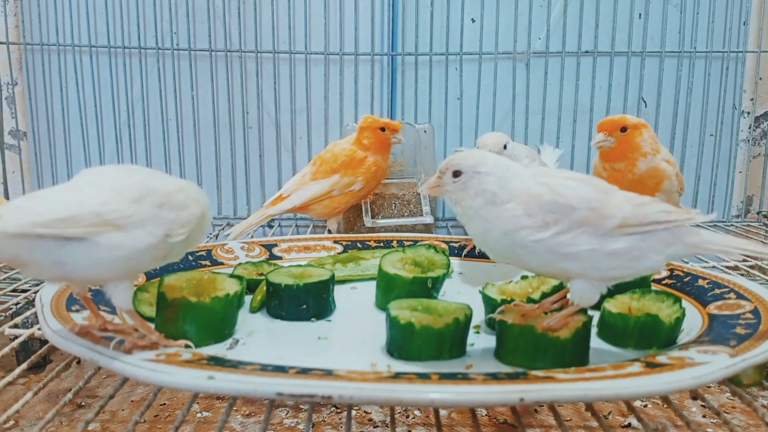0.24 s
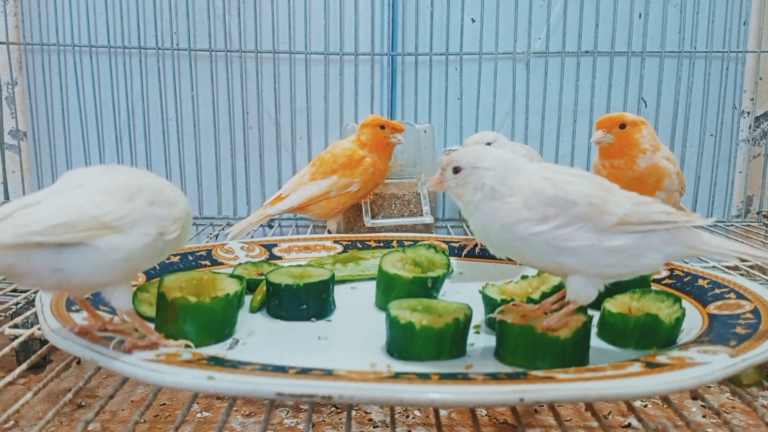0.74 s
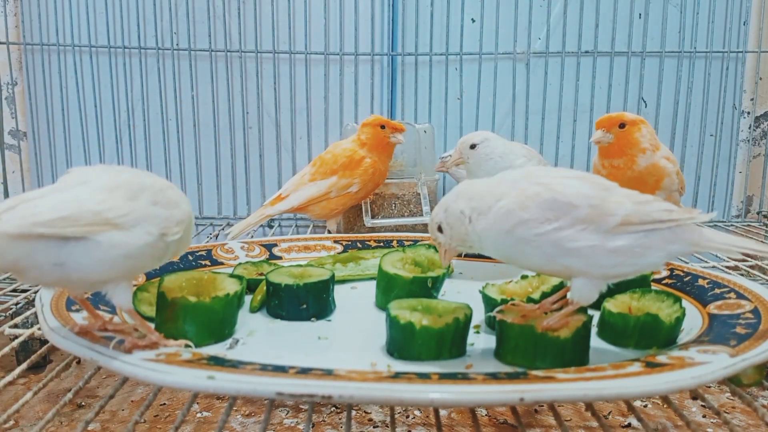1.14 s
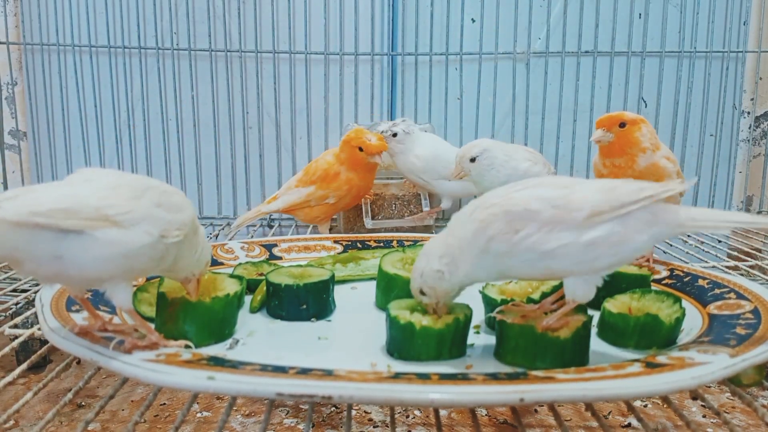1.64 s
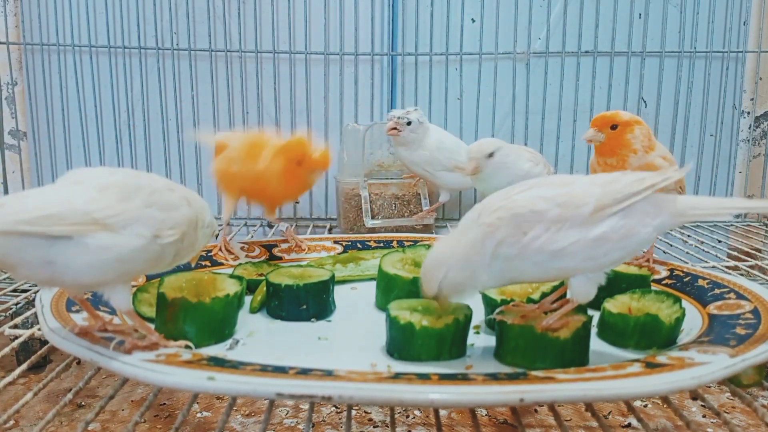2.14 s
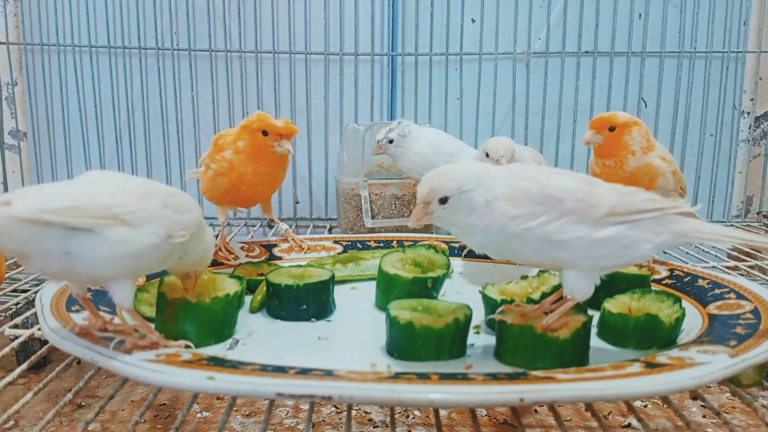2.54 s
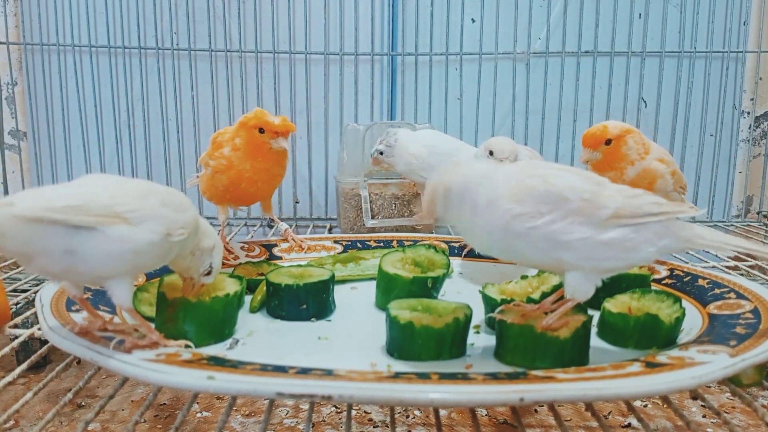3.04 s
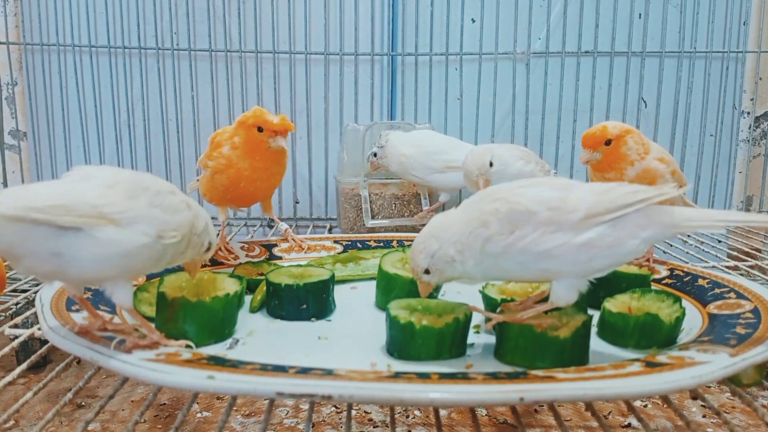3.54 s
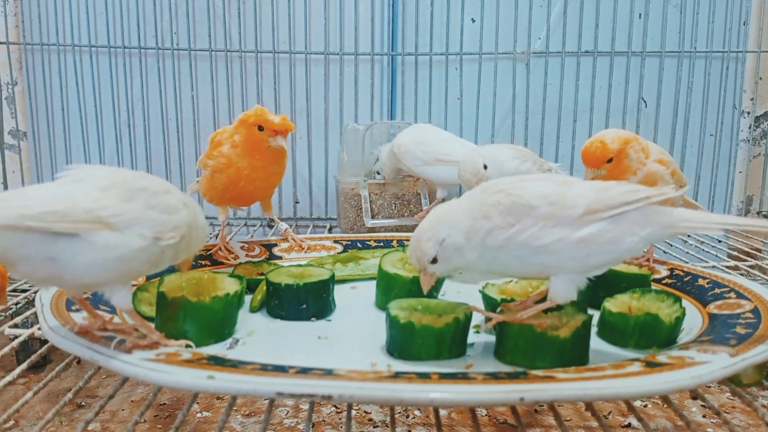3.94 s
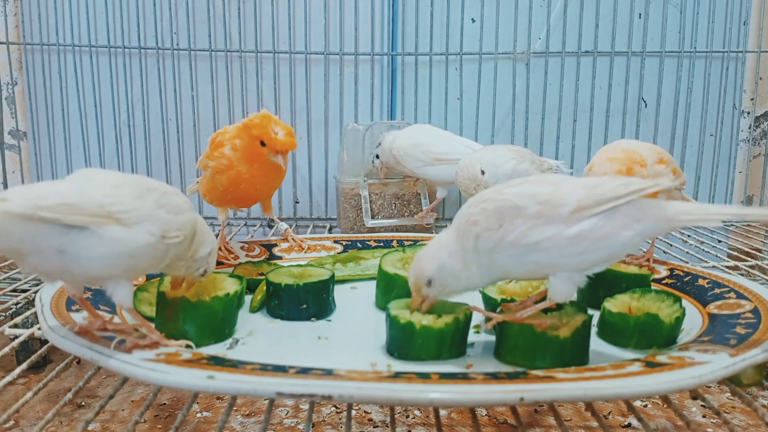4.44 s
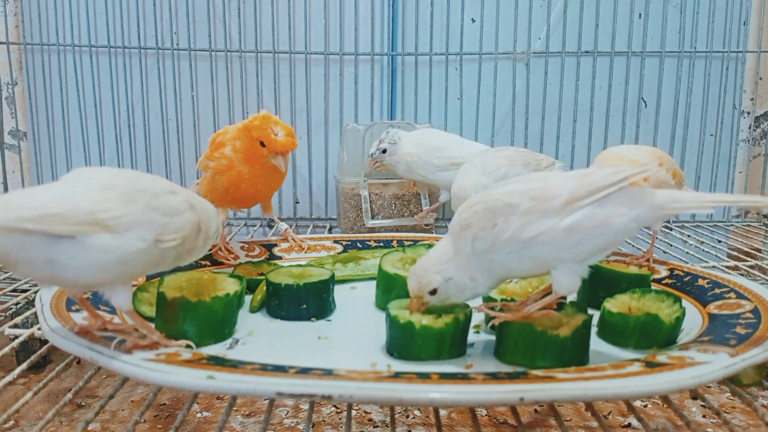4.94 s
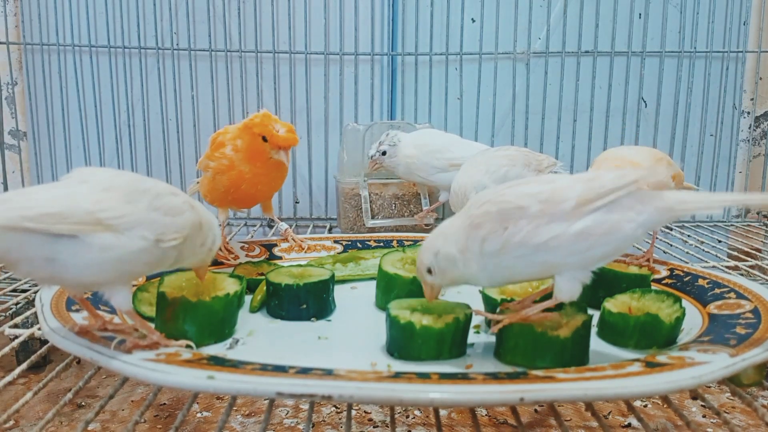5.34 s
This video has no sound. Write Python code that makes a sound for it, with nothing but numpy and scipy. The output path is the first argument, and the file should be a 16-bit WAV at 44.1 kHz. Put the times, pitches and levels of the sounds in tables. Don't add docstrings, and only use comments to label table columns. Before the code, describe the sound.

Several canaries whistle, trill and scold hoarsely in overlapping quick calls inside an echoing indoor cage, over a low house hum.

```python
import sys
import numpy as np
from scipy import signal
from scipy.fft import rfft, irfft
from scipy.io import wavfile
from scipy.ndimage import uniform_filter1d

SR = 44100
rng = np.random.default_rng(int(sys.argv[2]) if len(sys.argv) > 2 else 0)


def level_to_linear(level):
    exponent = np.asarray(level, float) / 20
    return 10 ** exponent


def bounce(signal):
    frames = np.transpose(np.atleast_2d(signal))
    limited = np.clip(frames, -1, 1)
    pcm = np.round(limited * 32767).astype(np.int16)
    wavfile.write(sys.argv[1], SR, pcm)


N = 246959


def unit(x):
    return x / np.sqrt(np.mean(x ** 2) + 1e-18)


def ring(x, hz, width_hz):
    return signal.lfilter(*signal.iirpeak(hz, hz / width_hz, fs=SR), x)


def steep(x, hz, width_hz):
    for _ in range(3):
        x = ring(x, hz, width_hz)
    return x


def walk(rate, size):
    k = max(int(SR / rate), 2)
    noise = rng.standard_normal(size + 4 * k)
    smooth = uniform_filter1d(uniform_filter1d(noise, k), k)
    return unit(smooth[2 * k:2 * k + size])


def add(out, sound, start_s, pan_db):
    i = int(max(start_s, 0) * SR)
    sides = level_to_linear(np.array([[pan_db], [-pan_db]]) / 2)
    out[:, i:i + len(sound)] += sound[:N - i] * sides


def walls(x, early_db, early_s, late_db, late_s):
    t = np.arange(int(.6 * SR)) / SR
    early = level_to_linear(early_db - 60 * t / early_s) / np.sqrt(early_s)
    late = level_to_linear(late_db - 60 * t / late_s) / np.sqrt(late_s)
    onset = np.clip(t / 0.0019, 0, 1)
    echo = rng.standard_normal((2, len(t))) * (early + late) * onset * np.sqrt(14 / SR)
    shared = echo.mean(axis=0)
    treble = signal.butter(2, 2000, "high", fs=SR, output="sos")
    echo = shared * 1.12 + signal.sosfilt(treble, 1.2 * (echo - shared))
    return signal.fftconvolve(np.tile(x.mean(axis=0), (2, 1)), echo, axes=1)[:, :N]


def whistle(note, flutter_db, flutter_rate, wobble, overtone_db, edge_s):
    s, hz, db = np.transpose(note)
    t = np.arange(s[0] - edge_s, s[-1] + edge_s, 1 / SR)
    pitch = uniform_filter1d(np.interp(t, s, hz), size=60) * (1 + wobble * walk(flutter_rate, len(t)))
    phase = 2 * np.pi * np.cumsum(pitch) / SR
    to_end_s = np.minimum(t - t[0], t[-1] - t)
    edge = np.sin(np.pi / 2 * np.clip(to_end_s / (2 * edge_s), 0, 1)) ** 2
    strength = edge * level_to_linear(np.interp(t, s, db) + flutter_db * walk(flutter_rate, len(t)))
    return np.sqrt(2) * strength * (np.sin(phase) + level_to_linear(overtone_db) * np.sin(2 * phase))


SYLLABLE_SHAPES = {"even": (.1, 0, .5, -1, -2), "glide": (.1, 0, .55, -9, -10),
                   "swell": (.3, 0, .9, -12, -2), "fade": (.1, 0, .1, -1, -10),
                   "ease": (1.3, 0, .45, -7, -7), "hook": (6, 0, .3, -9, -8), "leap": (1.3, 0, .2, -1, -6),
                   "sag": (-1.3, 0, .4, -15, -10), "droop": (-4, 0, .6, -1.5, -4),
                   "arch": (6, .95, .5, -7, -6)}


def syllable(kind, start_s, length_s, from_hz, to_hz, level_db):
    haste, back, top, start_db, end_db = SYLLABLE_SHAPES[kind]
    share = np.arange(17) / 16
    slide = np.expm1(-haste * share) / np.expm1(-haste) - back * share ** 3
    strength_db = np.interp(share, [0, np.clip(top, .02, .98), 1], [start_db, 0, end_db])
    pitch_hz = from_hz + (to_hz - from_hz) * slide
    return np.transpose([start_s + share * length_s, pitch_hz, level_db + strength_db])


def perched(perches, pans_db):
    return [(syllable(*row), pan_db) for rows, pan_db in zip(perches, pans_db) for row in rows]


# kind, start_s, length_s, from_hz, to_hz, level_db
NEAR_LEFT = [
    ("leap", 0, .048, 4570, 5480, -30),
    ("droop", .048, .045, 5520, 5000, -34),
    ("leap", .095, .18, 4930, 4200, -29),
    ("ease", .095, .15, 9860, 8600, -60),
    ("swell", 1.012, .05, 3030, 2960, -35),
    ("even", 1.062, .075, 2960, 2250, -32),
    ("leap", 1.137, .033, 2250, 2040, -35),
    ("fade", 4.855, .055, 4140, 4214, -33),
]
NEAR_MIDDLE = [("leap", 0, .045, 3347, 5500, -29), ("sag", 2.165, .092, 2340, 2480, -23.5),
               ("ease", 2.303, .013, 2820, 3800, -29), ("droop", 2.316, .019, 3950, 2950, -25),
               ("droop", 2.344, .024, 3800, 2950, -19), ("arch", 2.37, .026, 2950, 3750, -15.5),
               ("arch", 2.398, .02, 2900, 3620, -23), ("fade", 2.78, .055, 4860, 4440, -31),
               ("droop", 4.61, .017, 3420, 2800, -20), ("sag", 4.786, .012, 3860, 5920, -21),
               ("swell", 4.91, .027, 2850, 3010, -19), ("ease", 4.939, .026, 2250, 2870, -22.5),
               ("ease", 5.008, .036, 2120, 2750, -22), ("leap", 5.047, .016, 2480, 2680, -30),
               ("swell", 4.924, .016, 2220, 2280, -34), ("fade", 4.962, .014, 2850, 2330, -33)]
NEAR_RIGHT = [("swell", .115, .06, 4320, 4160, -32), ("swell", .343, .014, 4850, 4730, -26),
              ("leap", .357, .018, 4650, 3100, -35), ("ease", .622, .028, 4900, 3600, -25),
              ("even", .65, .042, 3560, 3500, -31.5), ("hook", 2.515, .032, 2830, 3040, -22.5),
              ("even", 4.763, .008, 3600, 4000, -26), ("swell", 4.77, .017, 3950, 3830, -18),
              ("fade", 4.788, .027, 3850, 3830, -29), ("leap", 4.977, .021, 2900, 2980, -25),
              ("swell", 4.998, .017, 2950, 3020, -20)]
# time_s, pitch_hz, level_db
DIP_AND_RISE = [(1.87, 3025, -42), (1.964, 2760, -30), (2.017, 2640, -34), (2.06, 2830, -25),
                (2.086, 2988, -16.5), (2.108, 3020, -17.5), (2.116, 2980, -42)]
TRILL_END = [(2.417, 3060, -24), (2.433, 3670, -30), (2.475, 3570, -19.5), (2.504, 2980, -18.5),
             (2.515, 2820, -27)]
FLAT_PIPE = [(4.4, 2635, -53), (4.431, 2696, -34.5), (4.485, 2691, -26), (4.544, 2680, -32.5),
             (4.56, 2620, -48)]
LOUD_CHIRP = [(4.638, 3200, -24), (4.645, 3663, -19.5), (4.654, 3270, -16), (4.701, 2930, -13.5),
              (4.709, 3035, -24), (4.72, 2850, -24)]
HIGH_CHIRP = [(4.797, 5800, -30), (4.802, 4780, -21), (4.812, 4500, -19), (4.825, 4280, -15.5),
              (4.837, 4250, -22), (4.848, 4000, -16), (4.852, 4000, -42)]


def near_whistles():
    out = np.zeros((2, N))
    left_db, middle_db, right_db = 5.5, 1.0, -4.5
    notes = perched((NEAR_LEFT, NEAR_MIDDLE, NEAR_RIGHT), (left_db, middle_db, right_db))
    notes += [(DIP_AND_RISE, left_db), (FLAT_PIPE, 10.0)]
    notes += [(note, middle_db) for note in (TRILL_END, LOUD_CHIRP, HIGH_CHIRP)]
    for note, pan_db in notes:
        sound = whistle(note, flutter_db=1.2, flutter_rate=250, wobble=.004, overtone_db=-54, edge_s=.003)
        add(out, sound, note[0][0] - .003, pan_db)
    return out


def rasp(length_s, level_db, throat_hz, bright_db):
    whole_s = length_s + 0.033
    t = np.arange(0, whole_s, 1 / SR)
    size = len(t)
    cycle = np.cumsum(120 * (1 + .2 * walk(60, size)) / SR) % 1
    puff = .15 + np.exp(-cycle / 0.25)
    air = puff * level_to_linear(1.4 * walk(110, size) + 2.0 * walk(25, size)) * rng.standard_normal(size)
    throat = unit(steep(air, throat_hz, 560))
    throat = throat + level_to_linear(-3) * buzz(whole_s, throat_hz, 0.1 * throat_hz, 132, 0)
    grains = (.12 + np.sin(np.pi * cycle) ** 2) * level_to_linear(2.2 * walk(70, size))
    throat = unit(throat * grains)
    throat = throat + level_to_linear(-6.5) * unit(steep(air, 0.74 * throat_hz, 900))
    throat = throat + level_to_linear(-6.5) * unit(steep(air, 3800, 1500))
    beak = unit(steep(air, 7700, 1700)) + level_to_linear(-11) * unit(steep(air, 5850, 500))
    beak = beak + level_to_linear(-13.5) * unit(steep(air, 10170, 3400)) + level_to_linear(-17) * unit(steep(air, 14600, 2600))
    swell = np.clip(t / .012, 0, 1) * np.clip((whole_s - t) / 0.055, 0, 1)
    opening = np.abs(np.sin(np.pi * t / whole_s)) ** 0.55
    return level_to_linear(level_db) * swell * (unit(throat) + level_to_linear(bright_db) * opening * beak)


# start_s, length_s, level_db, throat_hz
SHARP_SCOLDS = [
    (0, 0.043, -41, 4140),
    (0.153, 0.1, -43, 2750),
    (1.012, 0.071, -52.5, 2590),
    (1.264, 0.047, -42, 2680),
    (1.66, 0.027, -51, 2600),
    (1.951, .11, -38.5, 2700),
    (2.159, 0.06, -35, 2980),
    (2.424, 0.058, -42, 2520),
    (2.606, 0.059, -40, 3130),
    (4.65, .13, -42.5, 2560),
]
PLAIN_SCOLDS = [(0.316, .12, -38.5, 2870), (0.521, 0.17, -39.5, 2663), (0.738, .11, -38, 2810),
                (1.099, 0.072, -45.5, 2340), (1.41, 0.15, -40, 2740), (1.597, 0.063, -38, 2760),
                (1.845, .05, -40.5, 2540), (2.778, 0.1, -40, 2870), (3.01, 0.05, -44, 2500),
                (3.164, 0.03, -46.5, 2870), (3.29, 0.056, -40.5, 2775), (3.441, 0.077, -40, 2790),
                (3.925, 0.058, -51, 2176), (4.124, 0.12, -43.5, 2650), (4.479, 0.15, -43.5, 2570),
                (4.85, 0.043, -37, 2800), (5.175, 0.09, -49, 3280)]
DULL_SCOLDS = [
    (3.71, 0.11, -57, 1680),
    (3.795, 0.063, -47, 1860),
    (4.02, .05, -48.5, 2410),
    (4.343, 0.08, -49, 2350),
    (4.994, 0.055, -35, 2890),
]


def scolds():
    out = np.zeros((2, N))
    for rows, bright_db in ((SHARP_SCOLDS, -10.5), (PLAIN_SCOLDS, -15), (DULL_SCOLDS, -20.5)):
        for start_s, *voice in rows:
            add(out, rasp(*voice, bright_db), start_s - .006, pan_db=-2.0)
    return out


def coloured(points, alike_hz, draught_hz):
    hz = np.arange(N // 2 + 1) * SR / N + 1
    point_hz, point_db = np.transpose(points)
    shape = level_to_linear(np.interp(np.log(hz), np.log(point_hz), point_db))
    mid, side = rfft(rng.standard_normal((2, N))) * shape
    side = side * np.maximum(hz / (hz + alike_hz), draught_hz / (hz + draught_hz))
    return unit(irfft(np.array([mid + side, mid - side]), N))


# time_s, hum_db, twitter_db
ROOM_LEVELS = [(0, -45, -50), (1, -46.5, -52), (2.5, -46, -51.5), (3.6, -48, -53), (5.22, -50.5, -51),
               (5.32, -51, -60), (5.6, -48, -66)]
# pitch_hz, level_db (per Hz)
HUM_COLOUR = [(25, -32.5), (45, -12), (70, -2), (270, -11), (420, -13), (900, -16), (1600, -27),
              (3000, -26.5), (6000, -54)]
# pitch_hz, width_hz, level_db
ROOM_RINGS = [(115, 7.7, -4), (205, 15, -5.5), (266.6, 31, -3.5)]
# pitch_hz, level_db (per Hz)
TWITTER_COLOUR = [(500, -34.5), (1000, -4.5), (2000, -6), (4200, -7.5), (5600, -19), (8200, -21),
                  (9500, -20), (12300, -23), (13000, -31.5)]


def background():
    s, hum_db, twitter_db = np.transpose(ROOM_LEVELS)
    t = np.arange(N) / SR
    hum = coloured(HUM_COLOUR, alike_hz=1800, draught_hz=45)
    for hz, width_hz, db in ROOM_RINGS:
        tone = ring(ring(rng.standard_normal(N), hz, width_hz), hz, 4 * width_hz)
        hum = hum + level_to_linear(db) * unit(tone)
    twitter = coloured(TWITTER_COLOUR, alike_hz=18000, draught_hz=1) * level_to_linear(1.44 * walk(6.95, N))
    return hum * level_to_linear(np.interp(t, s, hum_db) - 4.0) + twitter * level_to_linear(np.interp(t, s, twitter_db))


# kind, start_s, length_s, from_hz, to_hz, level_db
FAR_LEFT = [
    ("swell", .022, .103, 3430, 3720, -33),
    ("even", .72, .06, 2190, 2170, -52),
    ("fade", .8, .06, 4086, 3950, -46),
    ("even", 1.42, .04, 6300, 6200, -56),
    ("ease", 1.575, .085, 2150, 2750, -38),
    ("swell", 1.865, .035, 6050, 5780, -40),
    ("even", 2.505, .11, 6715, 6710, -47),
    ("ease", 3.25, .18, 2440, 2770, -46),
]
FAR_MIDDLE = [("fade", .7, .03, 3520, 3480, -38), ("swell", .92, .055, 3900, 4300, -44),
              ("even", .9, .09, 3200, 3800, -54), ("ease", 1.352, .045, 4150, 4300, -45),
              ("fade", 2.642, .06, 5950, 5850, -46), ("fade", 2.728, .024, 8350, 7300, -50),
              ("fade", 1.205, .065, 3900, 3850, -47), ("ease", 1.525, .105, 4990, 4160, -43),
              ("even", 1.63, .22, 1920, 2000, -49), ("droop", 1.685, .045, 4900, 4620, -40),
              ("ease", 1.73, .04, 4620, 4300, -35), ("fade", 1.77, .05, 4300, 4300, -38),
              ("hook", 2.065, .075, 3890, 4250, -42), ("hook", 2.12, .12, 6700, 5780, -40),
              ("arch", 2.21, .115, 7150, 6550, -43), ("even", 2.725, .028, 6100, 4600, -36),
              ("droop", 2.753, .009, 4600, 3700, -37), ("swell", 2.75, .03, 7000, 4850, -37),
              ("droop", 2.843, .034, 3800, 2900, -35), ("fade", 2.84, .06, 4600, 4060, -31),
              ("swell", 3.175, .025, 3600, 2820, -41), ("swell", 3.315, .02, 4100, 2700, -30.5),
              ("fade", 3.64, .11, 3850, 3930, -63), ("droop", 5.315, .045, 4430, 4200, -44),
              ("fade", 5.33, .04, 8930, 8530, -59)]
FAR_RIGHT = [("arch", .39, .075, 3800, 4300, -46), ("arch", .535, .05, 3880, 4200, -42),
             ("even", .71, .045, 4400, 4105, -45), ("swell", .965, .035, 3930, 4120, -46),
             ("hook", 1.085, .07, 5200, 3640, -33), ("ease", 1.16, .04, 3650, 3960, -35),
             ("ease", 1.283, .04, 2950, 3320, -37), ("droop", 1.323, .014, 3320, 3080, -40),
             ("ease", 1.895, .05, 5450, 3170, -34), ("sag", 2.055, .085, 8520, 7240, -41),
             ("glide", 2.32, .11, 8400, 7480, -41), ("even", 2.43, .09, 7450, 5800, -60),
             ("even", 2.68, .03, 5000, 2940, -41), ("even", 2.87, .13, 7100, 7070, -63),
             ("even", 2.995, .035, 4640, 4340, -51), ("ease", 4.8, .05, 14500, 11800, -55),
             ("fade", 5.33, .2, 3560, 3530, -63)]
# time_s, pitch_hz, level_db
LOW_PIPE = [(2.725, 2010, -52), (2.803, 2195, -41), (2.864, 2378, -37), (2.89, 2330, -47),
            (3.001, 2368, -41), (3.1, 2224, -62)]
FAR_PIPE = [(3.38, 2097, -50), (3.47, 2010, -43), (3.57, 1640, -53), (3.66, 1881, -51), (3.8, 1956, -51),
            (3.95, 1960, -60)]


def far_whistles():
    out = np.zeros((2, N))
    left_db, middle_db, right_db = 5, -1.2, -7
    notes = perched((FAR_LEFT, FAR_MIDDLE, FAR_RIGHT), (left_db, middle_db, right_db))
    notes += [(FAR_PIPE, middle_db), (LOW_PIPE, 10.0)]
    for note, pan_db in notes:
        sound = whistle(note, flutter_db=2.0, flutter_rate=347, wobble=0.006, overtone_db=-41, edge_s=.004)
        add(out, sound, note[0][0] - .004, pan_db)
    return out


# time_s, pitch_hz, level_db
COOS = [
    [(.09, 370, -43), (.12, 387, -44), (.2, 381, -46)],
    [(1.56, 306, -45), (1.62, 274, -62)],
    [(2.8, 350, -46), (2.84, 385, -43), (2.9, 400, -50), (3.0, 415, -50), (3.04, 415, -66)],
    [(2.83, 470, -52), (2.95, 482, -47), (3.13, 485, -48), (3.2, 480, -58), (3.3, 475, -51),
     (3.4, 480, -66), (3.6, 478, -55), (3.65, 478, -66)],
]


def dove():
    out = np.zeros((2, N))
    for coo in COOS:
        sound = whistle(coo, flutter_db=3.5, flutter_rate=45, wobble=.025, overtone_db=-40, edge_s=.012)
        add(out, sound, coo[0][0] - .012, pan_db=0)
    blur = walls(out, early_db=-8.5, early_s=0.13, late_db=-8, late_s=0.6)[0]
    return out * level_to_linear(-3) + blur


def buzz(length_s, hz, swing_hz, rate, level_db, slide_hz=0):
    t = np.arange(0, length_s, 1 / SR)
    size = len(t)
    swing = np.cos(2 * np.pi * np.cumsum(rate * (1 + .18 * walk(50, size))) / SR)
    pitch = hz + slide_hz * t / length_s + swing_hz * swing * (1 + 0.26 * walk(80, size))
    phase = 2 * np.pi * np.cumsum(pitch) / SR
    edge = np.clip(np.minimum(t, length_s - t) / 0.0028, 0, 1)
    tone = np.sin(phase) + level_to_linear(-26) * np.sin(2 * phase) + level_to_linear(-38) * np.sin(3 * phase)
    return level_to_linear(level_db) * edge * unit(tone * level_to_linear(-2.5 * swing + 2.2 * walk(150, size)))


# start_s, length_s, pitch_hz, swing_hz, swings_per_s, level_db
BUZZES = [
    (.16, .05, 3700, 250, 120, -43),
    (1.343, 0.058, 3480, 200, 120, -37),
    (1.4, 0.04, 3650, 350, 134, -39),
    (2.602, 0.0426, 3214, 590, 95, -35),
    (2.62, 0.02, 5930, 400, 110, -33),
    (3.3, .12, 2650, 220, 130, -40),
    (3.4, .11, 2000, 110, 110, -44),
    (3.999, 0.27, 1980, 70, 45, -51.5),
    (5.171, 0.04, 4150, 700, 95, -37),
]


def buzzing_notes():
    out = np.zeros((2, N))
    for start_s, *voice in BUZZES:
        add(out, buzz(*voice), start_s, pan_db=.4)
    return out


# start_s, length_s, pitch_hz (centre), level_db
RUSTLES = [
    (.55, .15, 620, -58),
    (1.55, .2, 750, -55),
    (2.5, .1, 700, -58),
    (2.85, .2, 750, -59),
    (3.78, .12, 900, -57),
    (4.44, .2, 750, -54),
]


def rustles():
    out = np.zeros((2, N))
    for start_s, length_s, hz, level_db in RUSTLES:
        t = np.arange(0, length_s, 1 / SR)
        brush = rng.standard_normal(len(t)) * level_to_linear(5.0 * walk(60, len(t)))
        brush = unit(ring(ring(brush, hz, 0.9 * hz), hz, 0.9 * hz))
        add(out, level_to_linear(level_db) * np.sin(np.pi * t / length_s) ** .6 * brush, start_s, pan_db=0.3)
    return out


# start_s, length_s, from_hz, to_hz, level_db
SINKING = [
    (3.44, .07, 2950, 2750, -42),
    (1.262, .05, 3000, 1700, -43),
    (2.424, .04, 2900, 1750, -40),
    (4.847, .038, 3400, 1750, -39),
    (4.997, .03, 3700, 3100, -36),
]


def sinking_notes():
    out = np.zeros((2, N))
    for start_s, length_s, from_hz, to_hz, level_db in SINKING:
        add(out, buzz(length_s, from_hz, 260, 115, level_db, to_hz - from_hz), start_s, pan_db=-1.5)
    return out


def scene():
    near = near_whistles() + buzzing_notes() + rustles() + sinking_notes()
    far = scolds() + far_whistles()
    echoes = walls(near + level_to_linear(8) * far, early_db=-8, early_s=.07, late_db=-16.5, late_s=.33)
    return near + level_to_linear(-1.0) * far + echoes + dove() + background()


def top_cut(x):
    return signal.sosfilt(signal.butter(12, 16040, fs=SR, output="sos"), x)


def record(dry):
    low_pass = signal.ellip(10, .2, 70, 15720, fs=SR, output="sos")
    mix = signal.sosfilt(low_pass, dry)
    return top_cut(mix)


dry = scene()
out = record(dry)
bounce(out)
```